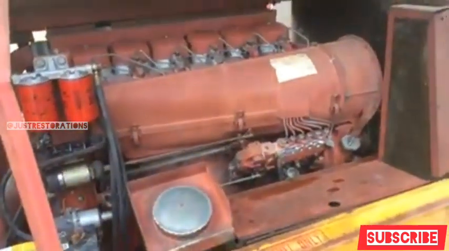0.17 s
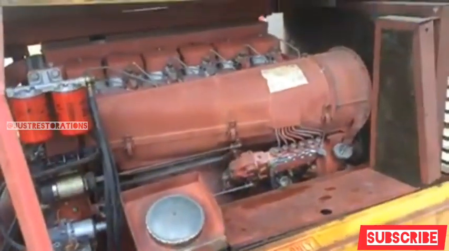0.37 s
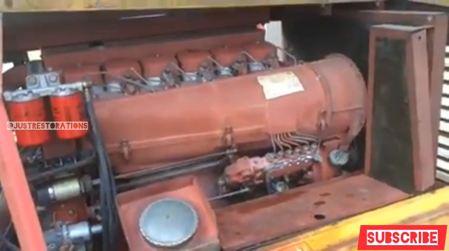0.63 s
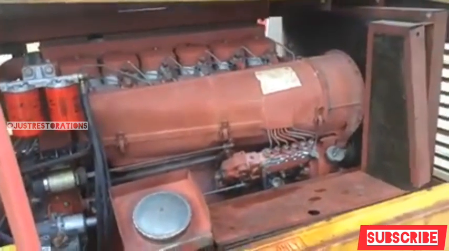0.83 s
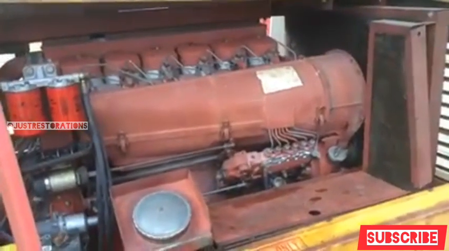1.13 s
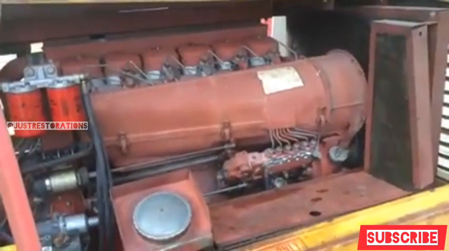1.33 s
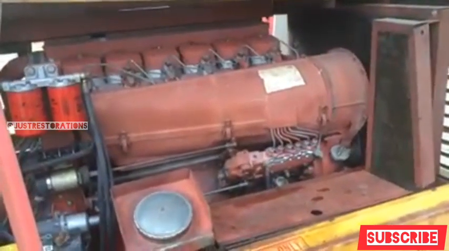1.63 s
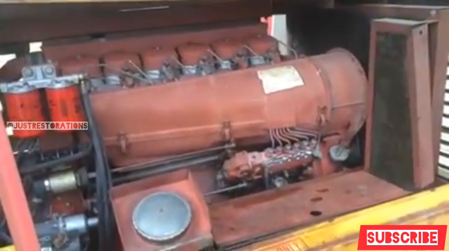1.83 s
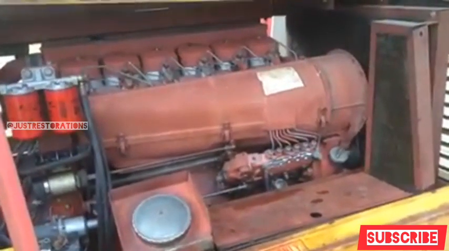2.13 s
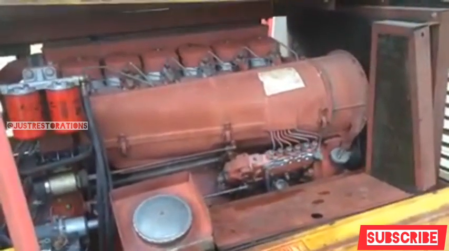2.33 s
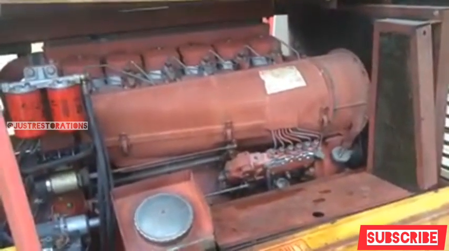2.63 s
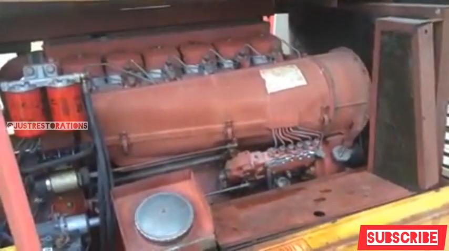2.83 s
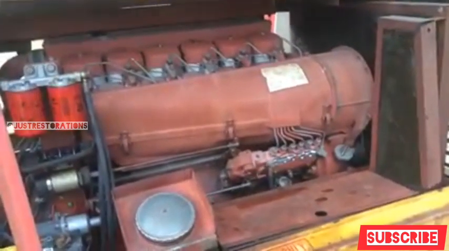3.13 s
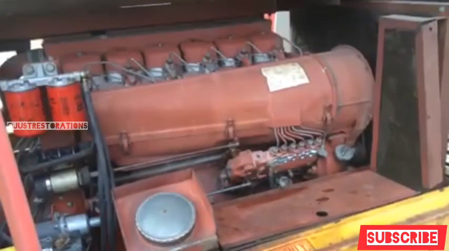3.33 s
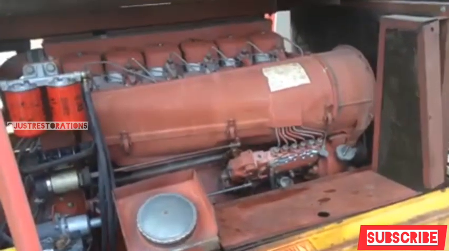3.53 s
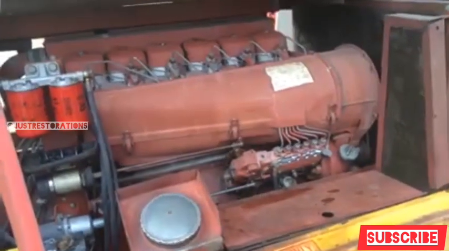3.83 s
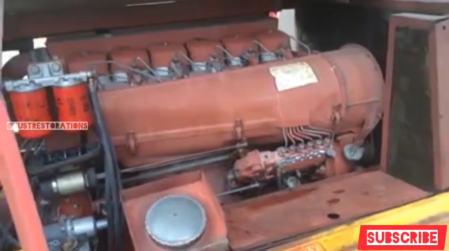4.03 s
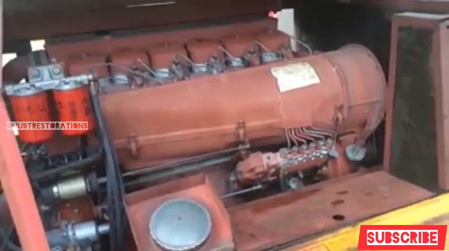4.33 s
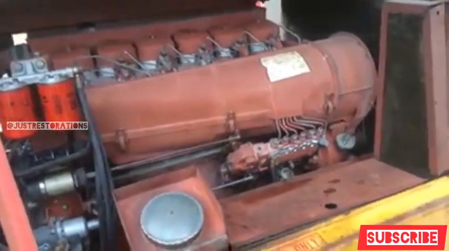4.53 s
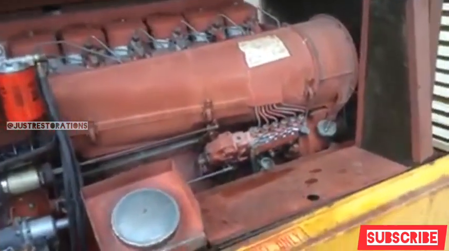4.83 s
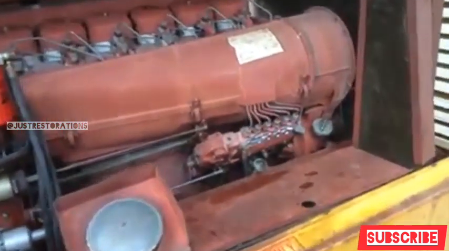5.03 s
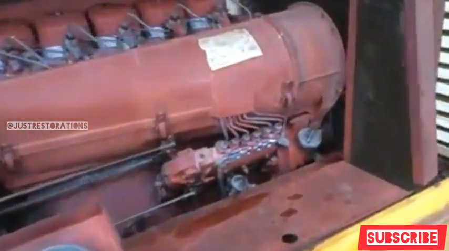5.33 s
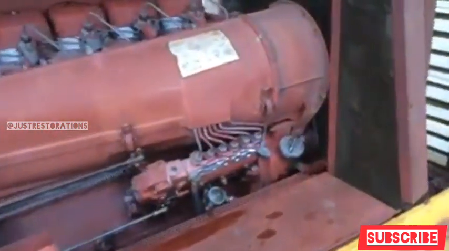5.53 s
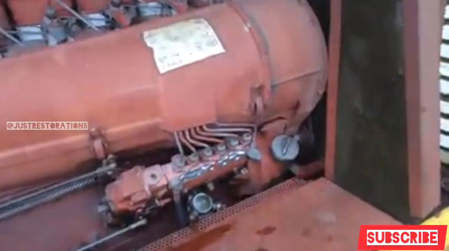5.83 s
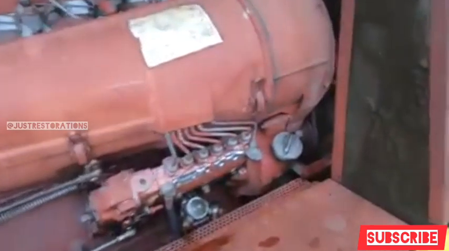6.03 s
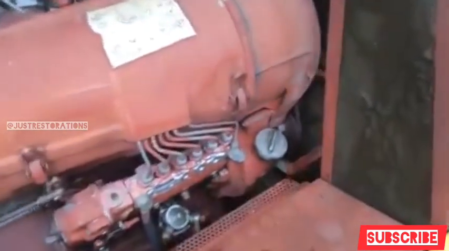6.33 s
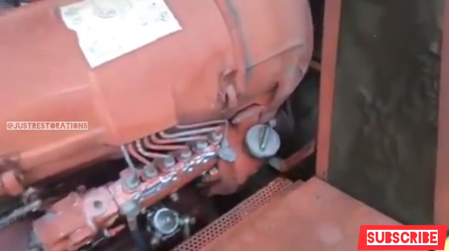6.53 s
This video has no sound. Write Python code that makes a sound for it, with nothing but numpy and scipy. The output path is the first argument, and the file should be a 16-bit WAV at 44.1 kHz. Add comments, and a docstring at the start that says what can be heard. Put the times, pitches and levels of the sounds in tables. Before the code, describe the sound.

For the first 1.4 seconds there is only a low, lumpy distant hum with a soft wash, broken at about 0.3 by a sharp, rattly metal switch snap that rings briefly. At 1.5 a heavy clunk engages the starter, which grinds harshly until 2.15, labouring in uneven pulses with short gliding groans. From 1.9 deep single firings thump, quickening among metallic knocks; a brief high squeal comes near 2.2 and a last heavy clank at 2.4. The engine races up, its pitch rising until about 2.7, then eases slightly into a fast, steady idle, with a little surging until about 4. A low buzzing drone, gritty clatter, faint gear whine, loose-metal rattle and broad fan roar fill the rest. From about 5 to the end at 6.7 the microphone leans in, making it somewhat louder, fuller and closer.

```python
"""Air-cooled diesel start

A six-cylinder diesel in an open steel canopy, heard from close by over a distant hum of shaped noise.
A switch snaps in noise bursts; the starter grinds as noise through resonances and groans in gliding tones.
Lone firings thump as decaying sines. The engine races up and settles to a fast idle: crank-locked tones
give drone, lope and gear whine, shaped noise gives clatter and fan roar. The listener leans in.
"""
import sys
import numpy as np
from scipy import signal
from scipy.fft import rfft, irfft, next_fast_len
from scipy.io import wavfile
from scipy.ndimage import uniform_filter1d

SR = 44100
rng = np.random.default_rng(int(sys.argv[2]) if len(sys.argv) > 2 else 0)


def unload_audio(sound):
    """Save the sound as a 16-bit wav file, at the path given as the first command line argument."""
    columns = np.transpose(np.atleast_2d(sound))
    # keep every value between -1 and 1, then stretch to whole-number steps
    steps = np.round(np.clip(columns, -1, 1) * 32767)
    wavfile.write(sys.argv[1], SR, steps.astype(np.int16))


N = 294588
CREST_DB = 4  # taken off the levels of hits


def undb(db):
    """Gain of a level in dB."""
    return np.exp(np.asarray(db) * np.log(10) / 20)


def unit(x):
    """Scale to rms 1."""
    return x / np.sqrt(np.mean(x ** 2) + 1e-20)


def curves(rows):
    """Columns interpolated over time in seconds."""
    s, *columns = np.transpose(rows)
    return [np.interp(np.arange(N) / SR, s, c) for c in columns]


def opens(s, fade_s):
    """Ramp from 0 to 1 that starts at s."""
    return np.clip((np.arange(N) / SR - s) / fade_s, 0, 1)


def bumps(rows):
    """Sum of bell-shaped swells in dB."""
    t = np.arange(N) / SR
    return sum(db * np.exp(-((t - s) / half_s) ** 2) for s, db, half_s in rows)


def hiss():
    """White noise."""
    return rng.standard_normal(N)


def noise(colour, low_hz=0, high_hz=30000):
    """Steady noise of a given colour, softly limited to a band; rms 1."""
    size = next_fast_len(N, real=True)
    hz = np.fft.rfftfreq(size, 1 / SR) + 1
    at_hz, db = np.transpose(colour)
    shape = undb(np.interp(np.log(hz), np.log(at_hz), db))
    shape /= np.sqrt((1 + (low_hz / hz) ** 8) * (1 + (hz / high_hz) ** 8))
    return unit(irfft(rfft(rng.standard_normal(size)) * shape, size)[:N])


def drift(rate_hz, size=1):
    """Slow random curve of spread near 1, at every size-th sample."""
    knots = rng.standard_normal(int(N / SR * 60) + 3)
    at = np.arange(0, N, size) / SR * min(rate_hz, 60)
    return np.interp(at, np.arange(len(knots)), knots) * 1.22


def resonate(x, peaks):
    """Parallel two-pole resonances of alternating sign."""
    out = np.zeros(N)
    for k, (hz, width_hz, db) in enumerate(peaks):
        r = np.exp(-np.pi * width_hz / SR)
        a = [1, -2 * r * np.cos(2 * np.pi * hz / SR), r * r]
        b = [(1 - r * r) / 2, 0, (r * r - 1) / 2]
        out += (-1) ** k * undb(db) * signal.lfilter(b, a, x + 1e-18)
    return out


def decay(s, t60_s, rise_s):
    """Envelope that starts at s, rises quickly and dies; top near 1."""
    out, start = np.zeros(N), int(s * SR)
    t = np.arange(min(int(2 * t60_s * SR), N - start)) / SR
    out[start:][:len(t)] = (1 - np.exp(-t / rise_s)) * undb(-60 * t / t60_s)
    return out


def tones(turns, orders, waver_db, smear):
    """Wavering crank-locked sines; a phase lag growing with order squared spreads the pulse."""
    out = np.zeros(N)
    for k, db in orders:
        gain = undb(np.broadcast_to(db, N)[::32] + waver_db * drift(5, size=32))
        out += np.repeat(gain, 32)[:N] * np.cos(2 * np.pi * k * turns - smear * k * k)
    return np.sqrt(2) * out


def heard(orders, shown):
    """Level of each multiple where the listener stands."""
    return [(round(k), afar + (close - afar) * shown) for k, afar, close in orders]


# Each row: time in seconds, level in dB.
HUM_LEVEL = [(0.0, -43.5), (0.3, -42), (0.5, -47), (0.9, -42), (1.46, -44.5)]
# Each row: frequency in Hz, density in dB per Hz.
HUM_SPECTRUM = [(15, -67.5), (25, -34), (60, -4.5), (121, -6), (150, -15.5), (186, -15.5), (293, -23.5),
                (326, -23.5), (529, -21), (655, -18.5), (790, -18), (1090, -23.5), (1240, -27.5),
                (4500, -50), (9500, -59.5), (11000, -66.5), (15000, -68)]


def hum():
    """Far traffic and machinery: a lumpy rumble under a steady wash."""
    hum_db, = curves(HUM_LEVEL)
    rumble = undb(hum_db + 7.5 + 2.4 * drift(6)) * noise(HUM_SPECTRUM, high_hz=302)
    return rumble + undb(hum_db + 0.6 * drift(2.7)) * noise(HUM_SPECTRUM, low_hz=300)


# Parts sliding and snapping over. Each row: start in seconds, peak in dB, rise in seconds,
# rattle t60 in seconds, body ringing over rattle in dB.
SNAPS = [(.281, -42, .004, 0.19, -13), (0.303, -16.5, 0.01, 0.045, 4.5), (.331, -28, .004, .05, -6),
         (0.3382, -2.5, 0.0015, 0.039, -3.5), (0.3444, -7, .0008, 0.036, -7),
         (0.354, -12, .001, 0.085, -21), (.377, -34.5, .001, 0.15, -17.5), (.404, -34.5, .001, 0.1, 0)]
# Each row: frequency in Hz, density in dB per Hz.
SNAP_SPECTRUM = [(120, -21.5), (200, 1), (485, -6), (613, -5.5), (946, 1), (1260, -8), (1490, 2),
                 (2800, -3), (3350, 1), (15000, -11)]
# Switch body, then mounting plate. Each row: frequency in Hz, width in Hz, gain in dB.
BODY_MODES = [(4500, 220, 0), (6940, 400, -2.5), (9500, 400, -7), (10150, 610, -3.5), (13800, 700, -8)]
PLATE_MODES = [(1750, 79, -2), (4720, 12, -1.5), (7180, 9.1, 6), (7390, 9, -2.5), (7690, 10, 4),
               (7760, 11, 2)]


def switch():
    """Short spiky rattles; some ring the switch body more than others; the plate rings on."""
    grit = undb(4.2 * hiss())
    rattling = unit(grit * noise(SNAP_SPECTRUM))
    ringing = unit(resonate(hiss(), BODY_MODES))
    snaps = np.zeros(N)
    for s, db, rise_s, t60_s, ring_db in SNAPS:
        hit = rattling + undb(ring_db) * ringing
        snaps += undb(db - CREST_DB) * decay(s, t60_s, rise_s) * hit
    return snaps + resonate(snaps, PLATE_MODES)


# Solenoid, pinion and first combustions. Each row: start in seconds, peak in dB,
# rattle t60 in seconds, treble in dB.
METAL_BLOWS = [(1.466, -46, .3, 3), (1.482, -29, 0.16, 6), (1.491, -18, 0.12, -7), (1.517, -2.5, 0.15, -14),
               (1.536, -22, 0.09, 13), (1.54, -11, 0.12, -16), (1.558, -15, 0.13, -11),
               (1.679, -15, 0.12, -5.5), (1.843, -10, 0.045, -10.5), (1.913, -19, 0.076, 3),
               (1.93, -21, 0.048, 4), (1.945, -8, 0.036, 0), (2.014, -10, 0.042, 3.5), (2.03, -24, .2, 5),
               (2.085, -14, 0.23, -3), (2.138, -7, 0.3, -6.5), (2.196, -4.5, 0.18, -11),
               (2.385, -14, 0.2, -12), (2.42, -1, 0.14, -13)]
# Each row: frequency in Hz, density in dB per Hz.
BLOW_SPECTRUM = [(59, -38), (100, -0.5), (257, -5), (324, -12), (582, -10.5), (674, -15), (867, -6.5),
                 (1560, -11), (5600, -15), (15000, -28)]


def blows():
    """Rattling hits on heavy castings, each with a treble of its own; weak ones lack the top."""
    top = noise(BLOW_SPECTRUM, low_hz=7500)
    bright = noise(BLOW_SPECTRUM, low_hz=2490, high_hz=7500)
    dull = noise(BLOW_SPECTRUM, high_hz=2500)
    out = np.zeros(N)
    for s, db, t60_s, treble_db in METAL_BLOWS:
        treble = undb(treble_db) * (bright + undb(0.48 * db) * top)
        out += undb(db - CREST_DB) * decay(s, t60_s, 0.0037) * (treble + dull)
    return out


# Compressions. Each row: time in seconds, extra effort in dB.
COMPRESSIONS = [(1.55, 8.5), (1.63, 2.5), (1.69, 3.5), (1.8, 6.5), (1.88, -0.5), (1.94, 3), (2.1, 5)]


def labour_db():
    """Starter labours against each compression and runs free past it."""
    return bumps([(s, db, 0.031) for s, db in COMPRESSIONS])


# Motor casing, then bell housing. Each row: frequency in Hz, width in Hz, level in dB.
CASING_MODES = [(178, 6.5, -25.5), (207, 20, 6), (262, 4.8, 4.5)]
BELL_MODES = [(428, 33, -3), (640, 14, -3), (826, 150, -7), (1330, 140, -12.5), (1910, 26, -13.5),
              (2260, 62, -17), (2500, 130, -22.5), (4120, 810, -28)]


def starter():
    """Uneven tooth contacts with scraping between them ring the casing and the bell housing."""
    mesh_s, unmesh_s, casing_db, grind_db, casing_share = 1.52, 2.15, -39.5, -26.5, 0.67
    gate = opens(mesh_s, 0.023) - opens(unmesh_s, .011)
    extra_db = labour_db()
    touch = (rng.random(N) < 160 / SR) * undb(2.1 * hiss())
    drive = unit(touch) + 1.26 * hiss()
    rings = [resonate(drive, [(hz, width_hz, 0)]) for hz, width_hz, _ in CASING_MODES]
    rings.append(resonate(drive, BELL_MODES))
    # level each ring, so that every pitch is heard evenly
    *casing, bell = [x / np.sqrt(uniform_filter1d(x * x, size=5000) + 1e-12) for x in rings]
    casing = sum(undb(db) * x for (_, _, db), x in zip(CASING_MODES, casing))
    return gate * (undb(casing_db + casing_share * extra_db) * casing + undb(grind_db + extra_db) * bell)


# Each row: start in seconds, length in seconds, first pitch in Hz, last pitch in Hz, level in dB.
STARTER_GROANS = [(1.547, 0.038, 274, 252, -23), (1.57, 0.076, 183.6, 211, -19.5),
                  (1.666, .04, 191, 210, -26), (1.685, 0.084, 245, 266, -26),
                  (1.777, 0.044, 268, 250, -22.5), (1.799, 0.088, 225.4, 188, -26),
                  (1.905, .06, 217, 190, -27), (1.91, 0.051, 335, 365, -20), (1.9, 0.055, 456, 424, -26),
                  (1.97, .04, 205, 215, -27)]
# Level of each harmonic in dB.
GROAN_HARMONICS_DB = [0, -12, -17, -12]


def groans():
    """Short gliding, wavering tones of the straining starter."""
    out = np.zeros(N)
    for s, length_s, from_hz, to_hz, db in STARTER_GROANS:
        t = np.arange(int(length_s * SR)) / SR
        cycles = t * (from_hz + (to_hz - from_hz) * t / length_s / 2)
        tone = sum(undb(over_db) * np.sin(2 * np.pi * k * cycles)
                   for k, over_db in enumerate(GROAN_HARMONICS_DB, 1))
        out[int(s * SR):][:len(t)] += undb(db) * np.sqrt(np.sin(np.pi * t / length_s)) * tone
    return np.sqrt(2) * undb(1.4 * drift(50.3)) * out


# Pinion thrown out of mesh. Each row: start in seconds, level in dB, t60 in seconds.
SKIDS = [(2.135, -26, .25), (2.19, -15.5, 0.23)]
# Each row: frequency in Hz, width in Hz, gain in dB.
SKID_MODES = [(7040, 110, 0)]


def squeals():
    """Overrun teeth skid and sing briefly as the engine outruns the starter."""
    skid = sum(undb(db) * decay(s, t60_s, 0.0047) for s, db, t60_s in SKIDS)
    return skid * unit(resonate(hiss(), SKID_MODES))


# Firings before they merge into a tone. Each row: start in seconds, strength in dB, pipe pitch in Hz.
LONE_FIRINGS = [(1.889, -4, 93), (1.981, 1, 95), (2.04, 1.5, 107), (2.086, 3, 100), (2.105, 0.5, 82),
                (2.135, 5, 108), (2.163, -14, 104)]


def thumps():
    """Each lone firing rings the exhaust pipe for a few skewed cycles."""
    out, t = np.zeros(N), np.arange(N) / SR
    for s, db, hz in LONE_FIRINGS:
        phase = 2 * np.pi * hz * (t - s)
        out += undb(db) * decay(s, 0.083, 0.0094) * (np.sin(phase) + 0.41 * np.cos(2 * phase))
    return out


# Each row: frequency in Hz, density in dB per Hz.
ROAR_SPECTRUM = [(15, -53), (25, -20), (43, -4), (62, -11), (80, -9), (248, -6.5), (287, -8.5), (533, -16),
                 (698, -13), (1770, -13.5), (1960, -16), (2270, -21), (3500, -12.5), (4550, -57),
                 (7700, -120)]


def roar(low_hz, high_hz=30000):
    """One band of the engine's broad noise; rms 1."""
    return noise(ROAR_SPECTRUM, low_hz, high_hz)


def rattle():
    """Loose sheet and linkages: uneven touches, each ringing at one of 30 pitches."""
    touches_per_s, low_hz, high_hz, ring_cycles = 1500, 1300, 5995, 130
    touch = (rng.random(N) < touches_per_s / SR) * undb(3 * np.minimum(rng.exponential(1, N), 3))
    dealt = rng.integers(0, 30, N)
    pitches_hz = np.geomspace(low_hz, high_hz, 30) * rng.uniform(.98, 1.02, 30)
    return unit(sum(unit(resonate(touch * (dealt == k), [(hz, 2.2 * hz / ring_cycles, 0)]))
                    for k, hz in enumerate(pitches_hz)))


# Each row: frequency in Hz, density in dB per Hz.
FAN_SPECTRUM = [(1060, -39), (1800, -9), (1950, -0.5), (2290, -2), (2880, -5.5), (3150, -6), (3960, -7.5),
                (4450, -7.5), (4820, -6.5), (5360, -5.5), (6020, -6), (8130, -7.5), (8890, -10.5),
                (12700, -12), (15000, -15.5)]


def fan(running, knock):
    """Cooling-air roar, pulsed slightly by combustion, with loose-metal rattle."""
    air = (1 + 0.081 * knock) * undb(-3.0 + 0.54 * drift(8)) * noise(FAN_SPECTRUM, low_hz=2410)
    return air + running * undb(-9) * rattle()


def taps(turns):
    """Valves, injectors and pump cams touch at the same crank angles, never quite as hard."""
    per_cycle = 60
    angles, sizes = np.sort(rng.random(per_cycle)), rng.standard_normal(per_cycle + 1)
    which = np.searchsorted(angles, turns % 1)
    touch = np.diff(which, prepend=which[0]) != 0
    return unit(touch * sizes[which] * undb(1.6 * hiss()))


# Gear tones. Each row: multiple of the cycle rate, level afar in dB, level close by in dB.
GEAR_TONES = [(51, -19, -29), (52, -19, -27), (53, -35, -31), (54, -30.5, -37), (55, -15, -31),
              (56, -18, -18.5), (60, -40, -22), (62, -26, -28), (63.6, -29.5, -30), (65.1, -19, -35),
              (67.4, -32, -33), (68.8, -18, -25), (69.5, -22, -25), (72, -22, -29), (73, -20, -22),
              (74, -24, -23), (78, -23.5, -19)]
# Cowl and canopy, cowl close by, block under load. Each row: frequency in Hz, width in Hz, gain in dB.
PANEL_MODES = [(972, 60, 11.5), (1456, 43, 8.5), (1790, 45, 5), (2142, 15, 3), (2740, 86, 8.5),
               (2980, 60, 1.5), (4725, 73, 7), (9050, 150, -30), (9600, 34, -33)]
NEAR_PANEL_MODES = [(1670, 180, -7.5), (2180, 100, 8), (3010, 130, -9)]
LOAD_MODES = [(665, 38, 10), (960, 27, 2), (830, 30, -10)]


def clatter(turns, running, whining, shown, fuel_db, knock):
    """Gear tones with slack, taps ringing the panels, mid-band roar, block ringing under load."""
    slack = 0.0016 * drift(25)
    out = whining * tones(turns + slack, heard(GEAR_TONES, shown), 1.24, .1)
    out += running * undb(-10.5) * unit(resonate(running * taps(turns) + 0.59 * hiss(), PANEL_MODES))
    out += (1 + 0.14 * knock) * undb(-4.5 + 0.14 * drift(17)) * roar(492, 2440)
    out += shown * undb(-13.5) * unit(resonate(hiss(), NEAR_PANEL_MODES))
    out += running * undb(-23 + fuel_db) * unit(resonate(hiss(), LOAD_MODES))
    return out


# Echoes. Each row: delay in seconds, level in dB.
CANOPY_ECHOES = [(.0017, -49), (.0031, -24.5), (.0052, -34), (.0083, -23), (.0121, -16.5), (.0174, -12.5)]


def canopy(x, near):
    """Short echoes off steel walls ripple the spectrum; paths shrink as the listener leans in."""
    at, shorter = np.arange(N), 1 - 0.1015 * near
    return x + sum((-1) ** k * undb(db) * np.interp(at - s * SR * shorter, at, x)
                   for k, (s, db) in enumerate(CANOPY_ECHOES))


# Each entry: whine as a multiple of the cycle rate.
WHINE_MULTIPLES = [98.4, 105.8, 116.4, 137.6, 147.6, 150.6, 158.5, 219.5, 234.8, 368.8]
# Each row: one whine, level in dB at each of three nearnesses.
WHINE_LEVELS = [(-40, -44, -44), (-37.5, -35, -37), (-36, -37, -44), (-41, -44, -46), (-39, -37, -39),
                (-31.5, -35, -40), (-34, -33, -29), (-38, -41, -41), (-42, -31, -37), (-38, -41, -43)]
# Those nearnesses, 0-1.
WHINE_NEARNESS = [.3, .6, .88]


def gear_whine(turns, near, knock):
    """Tooth-mesh tones, flickering in level and pitch, pulsed by combustion."""
    out = np.zeros(N)
    for k, levels_db in zip(WHINE_MULTIPLES, WHINE_LEVELS):
        gain = undb(np.interp(near, WHINE_NEARNESS, levels_db) + 2.5 * drift(50))
        out += gain * tones(turns + 0.0008 * drift(30), [(k, 0)], 1.3, 0)
    return (1 + .25 * knock) * out


# Each row: multiple of the cycle rate, level afar in dB, level close by in dB.
BLOCK_TONES = [(13, -4.5, -11), (14, -19, -23), (15, -4.5, -7.5), (16, -15, -13.5), (17, -9.5, -22.5),
               (19, -29, -18), (20, -14.5, -20), (21, -16, -25), (22, -7.5, -9.5), (23, -15, -13),
               (25, -20.5, -17), (26, -13, -8.5), (27, -11, -10), (33, -16.5, -20), (34, -14.5, -17),
               (35, -32, -14), (36, -13.5, -12.5), (37, -24.5, -23), (38, -21.5, -11), (40, -21.5, -26),
               (42, -21, -22), (45, -11, -17), (47, -17, -27), (48, -12, -20)]


def block(turns, running, shown, fuel_db, air_db, knock):
    """Block tones, weaker under load as the cylinders pull evenly, with noise between."""
    uneven = undb(-0.71 * np.maximum(fuel_db, 0))
    out = running * uneven * tones(turns, heard(BLOCK_TONES, shown), 0.7, .07)
    return out + (1 + 0.63 * knock) * undb(-9.5 + air_db) * roar(150, 640)


# Each row: multiple of the cycle rate, level afar in dB, level close by in dB.
LOPE_TONES = [(3, -28, -17), (4, -19, -26), (5, -19, -10), (7, -12.5, -8), (8, -3.5, -1.5), (9, -13, -8),
              (10, -8, -7.5), (11, -17, -11)]
# Each row: multiple of the cycle rate below the half tone, level in dB.
HUNT_TONES = [(6, -8), (7, -8), (8, -6.5), (9, -6), (10, -17)]
# Each row: time in seconds, hunting level in dB.
HUNT_LEVEL = [(2.7, -23), (2.92, 1.5), (3.5, 3), (3.85, -9), (4.1, -32), (6.68, -32)]


def lope(turns, whining, shown, air_db):
    """Uneven cylinders beat once a cycle; the governor hunts, surging every second cycle."""
    waver_db, hunt_lag_turns = 1.3, 1.159
    hunt_db, = curves(HUNT_LEVEL)
    out = whining * tones(turns, heard(LOPE_TONES, shown), waver_db, .022)
    out += undb(-7 + air_db) * roar(0, 151)
    halves = [(round(k) + .5, db) for k, db in HUNT_TONES]
    # negative smear: each surge falls in pitch
    return out + undb(hunt_db) * tones(turns - hunt_lag_turns, halves, 2 * waver_db, -.4)


# Each row: multiple of the firing rate, dB at idle, dB per dB of fuel, dB gained close by.
DRONE_TONES = [(1, -22, 0.62, 6.5), (2, -37, 2.3, 13), (3, -37, 1.78, -12), (4, -40, 0.7, 5.5),
               (5, -41, 1.2, 12.5), (6, -46, 1.8, 5), (7, -47, 1.8, 0)]
# Exhaust pipe. Each row: frequency in Hz, gain in dB.
PIPE_RESPONSE = [(35, -11), (57, -14), (66, -6), (76, 0), (96, 6), (110, 3), (122, 0.5), (135, -0.5),
                 (145, -7), (153, 2.5), (178, 8.5), (200, -2), (222, 10), (235, -0.5), (300, 3.5),
                 (400, -2)]


def drone(turns, firings_per_s, fuel_db, near):
    """Harmonics of the firing rate, coloured by the exhaust pipe."""
    pipe_hz, pipe_db = np.transpose(PIPE_RESPONSE)
    out = np.zeros(N)
    for k, db, fed, close_db in DRONE_TONES:
        through_db = np.interp(round(k) * firings_per_s, pipe_hz, pipe_db)
        gain = undb(db + fed * fuel_db + close_db * near + through_db)
        out += gain * tones(6 * turns, [(round(k), 0)], .6, .022 * 36)
    return out


# Each entry: strength of one of the six firings in dB.
FIRING_STRENGTHS_DB = [12.9, 10, 5.2, 11.6, 12, 13]


def combustion(turns, running, fuel_db):
    """Knock pulse of each firing; no two combustions alike."""
    cylinder, since = np.divmod(6 * turns, 1)
    firing = (cylinder - cylinder[0]).astype(int)
    chance_db = 3.2 * rng.standard_normal(600)[firing]
    strength_db = np.array(FIRING_STRENGTHS_DB)[cylinder.astype(int) % 6]
    pulse = 2.78 * since ** .5 * np.exp(-3.5 * since)
    return running * undb(chance_db + 0.19 * fuel_db + strength_db) * pulse


# Crankshaft. Each row: time in seconds, firings per second, fuel over idle in dB.
RUN_UP = [(1.56, 6.8, 3), (1.88, 8.7, -8), (2.04, 24, 7), (2.1, 33, 9.5), (2.18, 38, 10.5), (2.24, 41, 9.5),
          (2.32, 48.1, 8.5), (2.4, 59.5, 9), (2.45, 64.5, 7), (2.51, 69.8, 8.5), (2.59, 73.8, 4.5),
          (2.71, 78, 5), (2.8, 76.7, 3.5), (3.24, 76.3, 0), (5.1, 76.25, 0), (6.0, 76.5, 0),
          (6.68, 76.8, 0)]
# Listener leaning in. Each row: time in seconds, nearness 0-1.
NEARNESS = [(3.2, 0), (4.6, 0.09), (5.3, 0.4), (5.9, 0.76), (6.68, 0.93)]
# Layer levels: dB at idle, dB per doubling of speed, dB per dB of fuel, dB gained close by.
BLOCK_LEVEL = (-26, -2, .5, 3.5)
CLATTER_LEVEL = (-17.5, 3, .5, 3.5)
FAN_LEVEL = (-16, 5.5, 0.32, 2)
LOPE_LEVEL = (-26.5, 1.5, -0.04, 5)
# Lope sinking and swelling. Each row: time in seconds, extra level in dB, half length in seconds.
LOPE_SWELLS = [(1.84, -10, 0.037), (2.4, 8.5, 0.32), (3.15, 4, 0.59), (4.0, 5, 0.35), (4.7, 7, 0.16),
               (5.25, 8.5, 0.12), (5.8, 3.5, 0.12)]


def engine():
    """Drone, lope, block, clatter, whine and fan, all driven by speed, fuel and crank angle."""
    idle_firings_per_s, heavy_beat_s = 76.4, 5.785
    firings_per_s, fuel_db = curves(RUN_UP)
    near, = curves(NEARNESS)
    turning, running, whining = opens(1.55, 0.01), opens(2.11, 0.13), opens(2.52, 0.48)
    doublings = np.log2(firings_per_s / idle_firings_per_s)
    block_db, clatter_db, fan_db, lope_db = [
        db + faster * doublings + fed * fuel_db + close_db * near
        for db, faster, fed, close_db in (BLOCK_LEVEL, CLATTER_LEVEL, FAN_LEVEL, LOPE_LEVEL)]
    turns = np.cumsum(firings_per_s) / SR / 6  # whole cycles
    turns = turns - turns[round(heavy_beat_s * SR)]
    knock = combustion(turns, running, fuel_db)
    # the cowl hides one gear and shows another
    shown = np.clip((near - 0.39) / 0.39, 0, 1)
    air_db = .35 * np.maximum(fuel_db, 0) - 3 * shown
    body = undb(lope_db + bumps(LOPE_SWELLS)) * lope(turns, whining, shown, air_db)
    block_db = block_db + 0.45 * labour_db()
    body += undb(block_db) * block(turns, running, shown, fuel_db, air_db, knock)
    shell = undb(clatter_db) * clatter(turns, running, whining, shown, fuel_db, knock)
    shell += undb(fan_db) * fan(running, knock)
    out = opens(2.14, .1) * drone(turns, firings_per_s, fuel_db, near)
    out += opens(2.4, 0.22) * gear_whine(turns, near, knock)
    return out + turning * (body + canopy(shell, near))


def scene():
    """One microphone hears everything; two equal channels."""
    cranking = blows() + starter() + groans() + squeals()
    return np.tile(hum() + switch() + cranking + thumps() + engine(), (2, 1))


def top_cut(x):
    """Nothing passes above the cut-off."""
    return signal.sosfilt(signal.butter(12, 16450, fs=SR, output="sos"), x)


def record(dry):
    """Peaks are rounded; the deepest bass is thinned; the top steps down at 15.2 kHz, ends near 15.8 kHz."""
    step_hz, cutoff_hz = 15200, 15830
    hz = np.fft.rfftfreq(N, 1 / SR)
    below_step, below_cutoff = [.5 - .5 * np.tanh((hz - edge) / 60) for edge in (step_hz, cutoff_hz)]
    treble = (below_step + undb(-10) * (1 - below_step)) * below_cutoff
    rounded = 1.185 * np.tanh(dry / 1.357)
    x = signal.sosfilt(signal.butter(1, 45, "high", fs=SR, output="sos"), rounded)
    return top_cut(irfft(rfft(x) * treble, N))


dry = scene()
out = record(dry)
unload_audio(out)
```